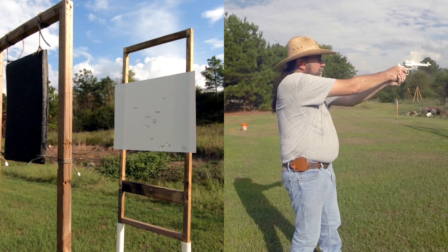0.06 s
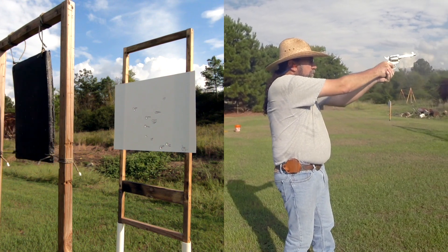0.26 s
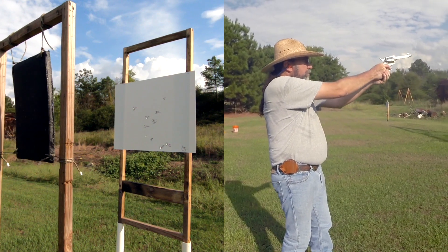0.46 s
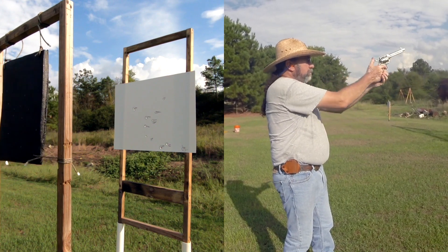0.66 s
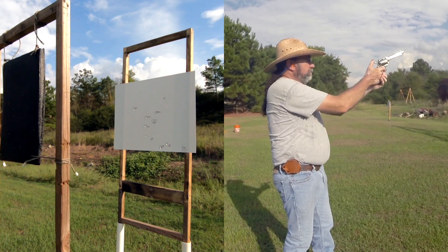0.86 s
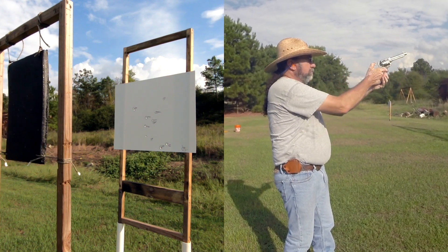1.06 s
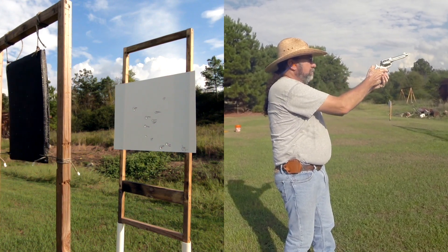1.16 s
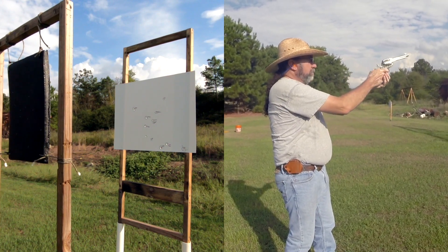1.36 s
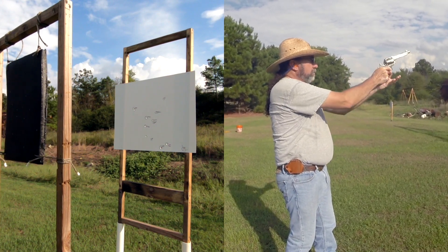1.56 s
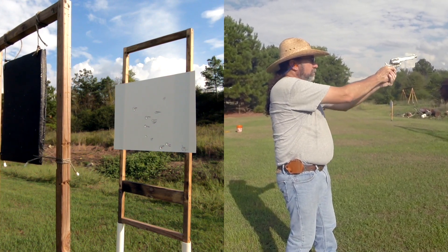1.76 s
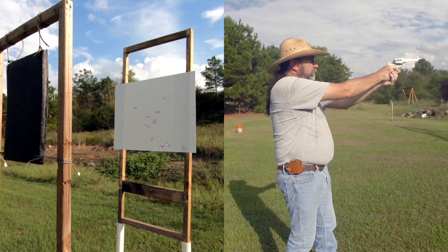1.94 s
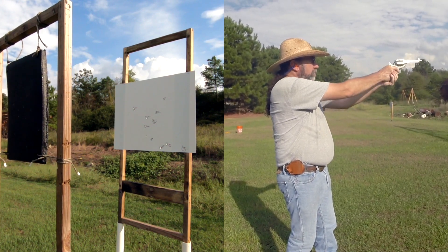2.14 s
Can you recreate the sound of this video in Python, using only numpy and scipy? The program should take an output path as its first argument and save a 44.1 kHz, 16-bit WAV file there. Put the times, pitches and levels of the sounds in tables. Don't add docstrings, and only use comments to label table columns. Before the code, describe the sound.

A single revolver shot, very close and clipped, fires at 0.23 s in an open field. Before it, low wind buffeting and small creaks of the camera mount at 0.10-0.15 s. Dense slap echoes start at 0.26 s and roll through trees, dulling and fading by about 1.8 s. Two crisp metallic hammer clicks sound at 1.19 and 1.26 s. Wind rumble, faint insect hiss and ticks continue to 2.2 s.

```python
import sys
import numpy as np
from scipy import signal
from scipy.fft import rfft, irfft, next_fast_len
from scipy.io import wavfile
from scipy.ndimage import uniform_filter1d, map_coordinates

SR = 44100
rng = np.random.default_rng(int(sys.argv[2]) if len(sys.argv) > 2 else 0)


def decibels_to_gain(level_db):
    exponent = np.asarray(level_db, float) / 20
    return 10 ** exponent


def bounce(signal):
    frames = np.transpose(np.atleast_2d(signal))
    limited = np.clip(frames, -1, 1)
    pcm = np.round(limited * 32767).astype(np.int16)
    wavfile.write(sys.argv[1], SR, pcm)


N = 97020
T = np.arange(N) / SR
SHOT_S = 0.2288

# delay/s, f/Hz, level/dB, t60/s
HOUSING_MODES = [(0, 1000, 8, 0.08), (0.0009, 2263, 2, 0.06), (0.001, 3030, -4, .05)]
# delay/s, f/Hz, level/dB, t60/s
SETTLING_MODES = [(.0019, 360, 1.5, .021), (.00275, 664, -2, .018), (.0042, 1300, -11, .024),
                  (.0036, 2300, -14, .014), (.007, 1050, -27, .06)]
# delay/s, f/Hz, level/dB, t60/s
DIAPHRAGM_MODES = [(.0018, 88, -4, .028), (.0032, 200, -10, .016)]
# f/Hz, density/dB
CRACK_SPECTRUM = [(300, -8), (1500, -6), (3200, -2.5), (6000, -1), (9000, -22.5), (16000, -33)]
# t/s, peak level/dB, f/Hz, cycles
SLAP_ECHOES = [(0.26, -15.5, 560, 2.9), (0.265, -16, 540, 4.4), (0.272, -18.5, 1100, 4.6),
               (0.283, -28, 595, 3.1), (0.319, -25, 816, 2.6), (0.336, -19.5, 814, 3.8),
               (0.369, -16.5, 720, 2.2), (0.378, -17.5, 1050, 2.5), (0.391, -13, 1043, 6.3),
               (0.403, -37, 1100, 2.3), (0.415, -14, 1135, 7.3), (0.425, -18, 1038, 2.2),
               (0.47, -16.5, 1130, 2.9), (0.499, -14, 1120, 6.1), (0.514, -21, 510, 3),
               (0.528, -20, 506, 4), (0.541, -16, 574, 4), (0.56, -17, 1050, 2.5), (0.593, -16, 970, 6.4),
               (0.62, -25, 700, 2.7), (0.653, -17, 770, 3.6), (0.692, -15, 880, 2.5),
               (0.724, -17.5, 1040, 3.5), (0.737, -17, 1070, 2.7), (0.789, -24, 972, 2.3),
               (0.802, -19, 1030, 4.9), (0.858, -13.5, 1100, 2.4), (0.885, -14, 1090, 2.7),
               (0.904, -19, 1050, 2.5), (0.926, -20.5, 1090, 4), (0.936, -18.5, 1060, 3.1),
               (0.955, -23, 1100, 3.8), (0.977, -20, 990, 3), (1.006, -17.5, 980, 1.9),
               (1.026, -19.5, 1120, 3), (1.109, -21.5, 1050, 4.8), (1.148, -18.5, 1070, 4.9),
               (1.216, -20, 1213, 3.3), (1.259, -23, 1056, 2.1), (1.32, -21, 960, 3),
               (1.381, -26, 1080, 5.4), (1.449, -23, 972, 2.2), (1.481, -19.5, 1030, 3.6),
               (1.508, -28, 1140, 5.8), (1.742, -23.5, 970, 4.5)]
# f/Hz, level/dB
SLAP_OVERTONES = [(2380, -10.5), (3700, -16.5)]
# t/s, level/dB, f/Hz
WALL_BOOMS = [(.263, -23, 487), (.33, -40, 222), (.40, -32, 191), (.44, -43, 226), (0.599, -40, 182),
              (.546, -22.5, 560), (.637, -27, 476), (.714, -24.5, 560), (0.727, -29.5, 445),
              (.79, -31, 509.5)]
# t/s, level/dB
ROLL_LEVEL = [(.235, -39), (.29, -66), (.31, -57), (.36, -43.5), (.41, -31.5), (.45, -36.5), (.49, -41),
              (.52, -32.5), (.8, -32.5), (.95, -32), (1.15, -32.5), (1.3, -35), (1.55, -42), (1.8, -45.5),
              (2.2, -51.5)]
# f/Hz, density/dB
NEAR_SPECTRUM = [(150, -12), (300, -23), (520, -8), (1100, 1), (1550, -7), (2400, -6.5), (3100, -17.5),
                 (3700, -16.5), (6300, -21), (9000, -30.5), (13000, -64)]
# f/Hz, density/dB
FAR_SPECTRUM = [(150, -30), (313, -19), (600, -6.5), (1110, 0), (1450, -11.5), (2000, -11.5), (3000, -23),
                (5300, -36), (8000, -40.5)]
# t/s, level/dB
WASH_LEVEL = [(.24, -55), (.3, -51.5), (.36, -50), (.42, -44), (.6, -48), (.8, -54.5), (1.1, -56.5),
              (1.4, -60)]
# f/Hz, density/dB
LEAF_SPECTRUM = [(1200, -38), (2000, 0), (3700, 1), (6000, -3.5), (7500, -6.5), (10000, -29), (13000, -44)]
# t/s, peak level/dB
HAMMER_CLICKS = [
    (1.1936, -21.5),
    (1.26, -19.5),
]
# f/Hz, level/dB, t60/s
STEEL_MODES = [
    [(5290, 1, 0.0091), (7660, -6, 0.0128), (9240, -1, 0.0108), (12770, -14, 0.0092)],
    [(3240, 1.5, 0.017), (4540, -6, 0.019), (6300, -3, 0.0153), (9400, -2, 0.016)],
]
# f/Hz, density/dB
RATTLE_SPECTRUM = [(2500, -33.5), (4800, -9), (5600, 1), (9300, -9), (13000, -12), (15300, -21),
                   (16500, -37)]
# t/s, body level/dB, tick level/dB
MOUNT_SLIPS = [
    (.1005, -34, -40),
    (0.1112, -21, -33),
    (0.1218, -19, -36),
    (0.1325, -20.5, -25.5),
    (0.1485, -53, -34),
]
# f/Hz, level/dB, t60/s
MOUNT_MODES = [(173, 2, 0.016), (342, 12, 0.013), (560, 9.5, 0.015), (782, 6.5, 0.033)]
# t/s, level/dB
WIND_LEVEL = [(0, -32), (.06, -38), (.12, -30.5), (.2, -40.5), (.228, -52), (.25, -66), (.4, -56),
              (.92, -50), (.97, -45.5), (1.08, -42.5), (1.3, -41.5), (1.38, -37.5), (1.47, -42.5),
              (1.78, -37), (1.83, -42.5), (2.05, -37), (2.11, -43), (2.2, -38)]
# f/Hz, density/dB
RUMBLE_SPECTRUM = [(10, -30), (24, 3.5), (70, -1), (160, -7.5), (320, -15.5), (500, -31), (1000, -52.5)]
# t/s, gain/dB
RECORDER_GAIN = [(0, 1), (.228, 0), (.3, -5), (.45, -6.5), (.75, -14), (1.0, -7), (1.3, -0.5), (1.6, -1.5),
                 (2.2, 0)]
# f/Hz, density/dB
AIR_SPECTRUM = [(200, -2.5), (400, 4.5), (1100, -1.5), (2250, -8.5), (4000, -15), (6500, -14), (9000, -8.5),
                (11500, -17.5), (15000, -17)]
# t/s, peak level/dB
INSECT_TICKS = [(0.1056, -36), (0.9695, -44), (1.0834, -43), (1.3586, -37), (1.4795, -42), (1.56, -40),
                (1.61, -36), (1.7791, -38.5), (1.989, -35), (2.165, -38)]
# f/Hz, level/dB
WHINE_TONES = [(4980, -72), (13905, -83)]


def unit(x):
    return x / np.sqrt(np.mean(x ** 2) + 1e-20)


def curve(rows):
    return np.interp(T, *np.transpose(rows))


def wobble(rate):
    knots = rng.standard_normal(int(N * rate / SR) + 4)
    return map_coordinates(knots, [T * rate])


def coloured(x, points):
    m = 2 ** 17
    f, db = np.transpose(points)
    log_f = np.log(np.fft.rfftfreq(m, 1 / SR) + 1)
    level_db = np.interp(log_f, np.log(f + 1), np.maximum(db, -70))
    cepstrum = irfft(np.log(decibels_to_gain(level_db)), m)
    cepstrum[1:m // 2] *= 2
    cepstrum[m // 2 + 1:] = 0
    return irfft(rfft(x, m) * np.exp(rfft(cepstrum)), m)[:N]


def noise_of(spectrum):
    return unit(coloured(rng.standard_normal(N), spectrum))


def filtered(x, response):
    m = next_fast_len(N + SR // 2)
    return irfft(rfft(x, m) * response(np.fft.rfftfreq(m, 1 / SR)), m)[..., :N]


def add(out, s, burst):
    part = out[round(s * SR):][:len(burst)]
    part += burst[:len(part)]


def decay(t, t60):
    return decibels_to_gain(-60 * t / t60)


def onset(t, attack_s):
    return 1 - np.exp(-t / attack_s)


def swell(t, length_s):
    x = 4 * t / length_s
    return x * np.exp(1 - x)


def ring(modes, attack_s):
    t = T[:SR // 10]
    x = sum(decibels_to_gain(db) * decay(t, t60) * np.sin(2 * np.pi * hz * t) for hz, db, t60 in modes)
    x = x * onset(t, attack_s)
    return x / np.abs(x).max()


def blast_modes(parts):
    out = np.zeros(N)
    for delay_s, hz, db, t60 in parts:
        t = np.maximum(T - SHOT_S - delay_s, 0)
        out -= decibels_to_gain(db) * decay(t, t60) * np.sin(2 * np.pi * hz * t)
    return out


def blast():
    t = np.maximum(T - SHOT_S, 0)
    noise = noise_of(CRACK_SPECTRUM) * onset(t, 0.0006)
    crack = decibels_to_gain(-6) * noise * decay(t, 0.06)
    sizzle = decibels_to_gain(-10) * noise * decay(t, 0.024)
    clamp_delay_s, clamp_depth_db, clamp_tau_s = 0.0034, -45, 0.0022
    clamp_db = clamp_depth_db * onset(np.maximum(t - clamp_delay_s, 0), clamp_tau_s)
    limited = decibels_to_gain(clamp_db) * (blast_modes(HOUSING_MODES) + crack)
    return limited + sizzle + blast_modes(SETTLING_MODES) - blast_modes(DIAPHRAGM_MODES)


def dulled_by_distance(x):
    near_until_s, far_at_s = 0.19, 1.41
    far = np.clip((T - near_until_s) / (far_at_s - near_until_s), 0, 1)
    return (1 - far) * unit(coloured(x, NEAR_SPECTRUM)) + far * unit(coloured(x, FAR_SPECTRUM))


def slaps():
    out, t = np.zeros(N), T[:3000]
    wake = dulled_by_distance(rng.standard_normal(N))
    chances = rng.standard_normal((len(SLAP_ECHOES), len(SLAP_OVERTONES)))
    for (s, db, hz, cycles), chance in zip(SLAP_ECHOES, chances):
        u = (t * hz / cycles - 1 / 2) * 4
        body = np.exp(-u ** 2) * np.sin(2 * np.pi * hz * t)
        air_loss_db = -12.5 * (s - SHOT_S)
        upper = 0
        for (f, level), c in zip(SLAP_OVERTONES, chance):
            tone = np.sin(2 * np.pi * f * (1 + 0.044 * c) * t)
            upper = upper + decibels_to_gain(level + air_loss_db + 2.2 * c) * tone
        body = body + upper * swell(t, 0.0031)
        tail = wake[round(s * SR):][:len(t)] * decibels_to_gain(-8.5) * decay(t, 0.042) * onset(t, 0.0013)
        add(out, s, decibels_to_gain(db - 3) * (body + tail))
    for s, db, hz in WALL_BOOMS:
        add(out, s, decibels_to_gain(db) * swell(t, 0.013) * np.sin(2 * np.pi * hz * t))
    return out


def roll():
    z = signal.stft(rng.standard_normal(N), nperseg=128)[2]
    patches = uniform_filter1d(rng.standard_normal(z.shape), size=4, axis=0)
    patches = uniform_filter1d(patches, size=4, axis=1)
    hits = signal.istft(z * decibels_to_gain(2.5 * unit(patches)), nperseg=128)[1][:N]
    level = decibels_to_gain(curve(ROLL_LEVEL) + 1 + 0.81 * wobble(29.67))
    return level * dulled_by_distance(hits) * (T > SHOT_S + 0.006)


def foliage():
    level = decibels_to_gain(curve(WASH_LEVEL) + 2.1 * wobble(24.3))
    return level * noise_of(LEAF_SPECTRUM) * (T > SHOT_S + 0.006)


def hammer():
    out, t = np.zeros(N), T[:SR // 10]
    grit = noise_of(RATTLE_SPECTRUM)
    for (s, db), modes in zip(HAMMER_CLICKS, STEEL_MODES):
        rattle = 0.59 * grit[round(s * SR):][:len(t)] * decay(t, 0.02) * onset(t, 0.0012)
        add(out, s, decibels_to_gain(db - 1.5) * (0.74 * ring(modes, attack_s=0.00074) + rattle))
    return out


def creak():
    out = np.zeros(N)
    hz = 3300
    tick_modes = [(hz, 0, 0.002), (1.2 * hz, -2, 0.002), (2.5 * hz, -6, 0.002), (0.88 * hz, -3, 0.003)]
    tick = ring(tick_modes, attack_s=0.0001)
    body = ring(MOUNT_MODES, attack_s=0.00047)
    for s, body_db, tick_db in MOUNT_SLIPS:
        add(out, s, decibels_to_gain(tick_db) * tick - decibels_to_gain(body_db) * body)
    return out


def wind():
    lumps = decibels_to_gain(1.3 * wobble(12)) * noise_of(RUMBLE_SPECTRUM)
    return decibels_to_gain(curve(WIND_LEVEL)) * unit(lumps)


def insect_hiss():
    centre_hz, width_hz = 8974, 470
    hiss = filtered(rng.standard_normal(N), lambda f: np.exp(-((f - centre_hz) / width_hz) ** 2))
    duck_db = 1.6 * curve(RECORDER_GAIN)
    return decibels_to_gain(-57.5 + duck_db + 4.5 * wobble(62) + 2.9 * wobble(4.0)) * unit(hiss)


def insect_ticks():
    out, t = np.zeros(N), T[:900]
    for s, db in INSECT_TICKS:
        add(out, s, decibels_to_gain(db - 1) * decay(t, 0.058) * rng.standard_normal(len(t)))
    return filtered(out, lambda f: 1 / (1 + (6500 / (f + 1)) ** 6) / (1 + (f / 14000) ** 6))


def field():
    gain_db = curve(RECORDER_GAIN)
    air = decibels_to_gain(-45 + 1.22 * wobble(6.2) + gain_db) * noise_of(AIR_SPECTRUM)
    whine = np.zeros(N)
    for hz, db in WHINE_TONES:
        whine += np.sqrt(2) * decibels_to_gain(db + 1.9 * wobble(8.0)) * np.sin(2 * np.pi * hz * T)
    return air + insect_hiss() + decibels_to_gain(0.71 * gain_db) * whine + insect_ticks()


def scene():
    backdrop = slaps() + roll() + foliage() + wind() + field()
    backdrop = filtered(backdrop, lambda f: f < 15150)
    slips = creak()
    side = -0.7 * filtered(slips, lambda f: (1j * f / (370 + 1j * f)) ** 2)
    return blast() + backdrop + hammer() + slips + np.array([side, -side])


def roll_off(x):
    return signal.sosfilt(signal.butter(12, 16450, fs=SR, output="sos"), x)


def record(dry):
    clip, top_hz = 0.96, 16300
    clipped = dry / (1 + np.abs(dry / clip) ** 8) ** (1 / 8)
    mix = filtered(clipped, lambda f: 1 / (1 + (f / top_hz) ** 60))
    return roll_off(mix)


dry = scene()
out = record(dry)
bounce(out)
```